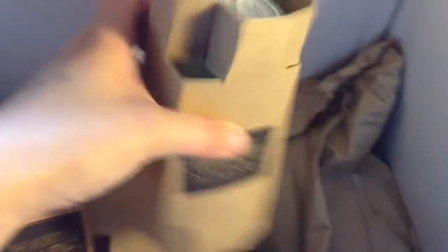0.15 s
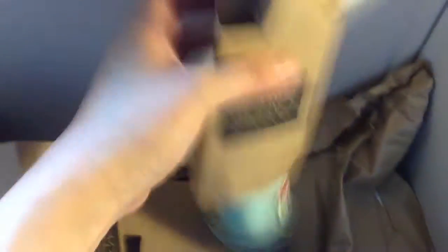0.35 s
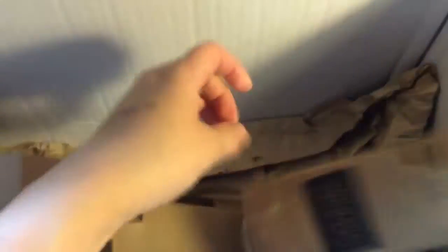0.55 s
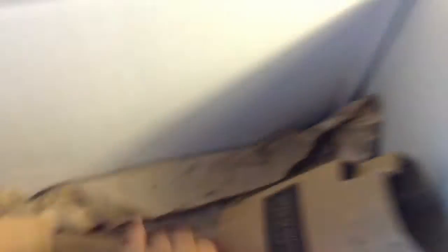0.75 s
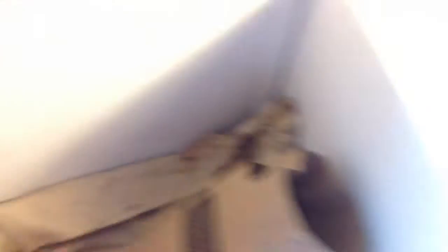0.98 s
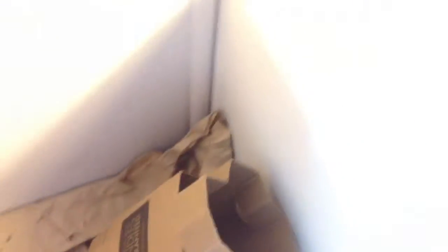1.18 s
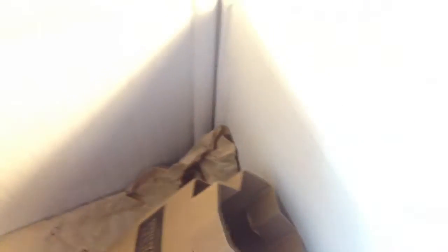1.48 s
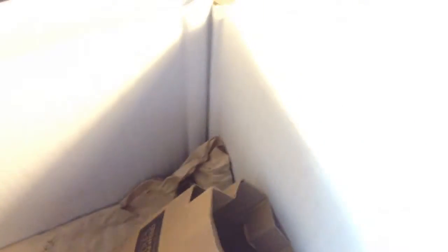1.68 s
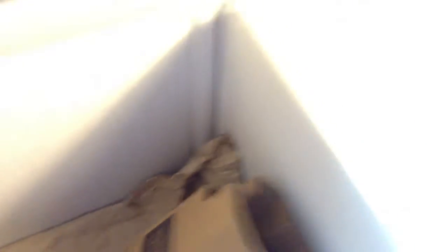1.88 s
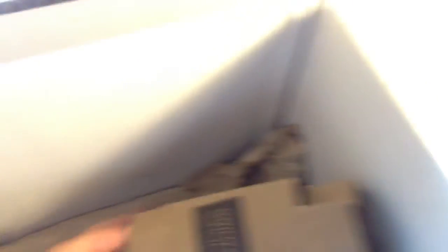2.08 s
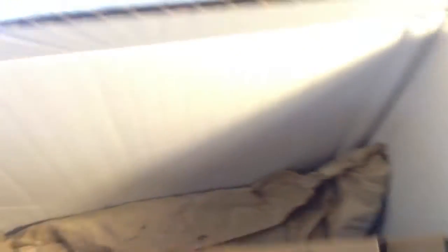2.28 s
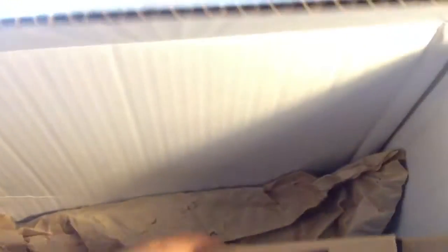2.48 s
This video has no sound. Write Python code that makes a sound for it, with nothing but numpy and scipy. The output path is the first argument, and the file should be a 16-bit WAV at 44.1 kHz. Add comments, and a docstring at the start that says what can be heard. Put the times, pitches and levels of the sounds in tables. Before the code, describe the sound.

Packing paper crinkles and rustles as a hand digs through a cardboard box, with knocks.

```python
"""A hand digs through a big cardboard box, close to the microphone, in a small room.
A small carton is lifted out of packing paper and set aside: its panels knock and its edges snap.
Paper crinkles, cardboard slides with a bright hiss and the walls rumble as they are handled.
Everything rings briefly in the hollow of the box and then in the room."""
import sys
import numpy as np
from scipy import signal
from scipy.fft import rfft, irfft, next_fast_len
from scipy.io import wavfile
from scipy.ndimage import map_coordinates

SR = 44100
rng = np.random.default_rng(int(sys.argv[2]) if len(sys.argv) > 2 else 0)


def put_to_file(sound):
    """Save the sound as 16-bit audio at rate SR, in the file named by the first command-line argument."""
    columns = np.atleast_2d(sound).T  # one column per channel
    safe = np.clip(columns, -1, 1)
    whole_steps = np.round(safe * 32767)
    wavfile.write(sys.argv[1], SR, whole_steps.astype(np.int16))


N = 116865

# strokes of the hand through paper and cardboard: start_s, length_s, hiss_db, crinkle_db, rumble_db
HAND_STROKES = [(0, 0.051, -45.5, -60, -61), (0.124, 0.04, -47.5, -57.5, -65),
                (0.21, 0.041, -35.5, -39, -55.5), (0.237, 0.053, -30.5, -29.5, -48),
                (0.323, .10, -38, -28, -26.5), (0.449, 0.063, -38, -31, -30),
                (0.526, 0.09, -39.5, -31.5, -33), (0.618, 0.037, -44, -40.5, -45),
                (0.682, 0.044, -50, -32, -38.5), (0.715, 0.058, -36, -32.5, -37.5),
                (0.837, 0.072, -45, -44, -51), (0.929, 0.097, -42, -41.5, -44.5),
                (1.04, 0.079, -45.5, -47.5, -48.5), (1.151, 0.062, -45.5, -53, -58),
                (1.206, 0.078, -36, -42.5, -42.5), (1.287, 0.087, -36, -47.5, -57),
                (1.328, 0.094, -36.5, -39, -47), (1.442, 0.048, -70, -63, -40),
                (1.503, 0.027, -39, -35, -30.5), (1.587, 0.39, -46, -46.5, -51),
                (1.733, 0.031, -35.5, -35.5, -36.5), (1.766, 0.063, -44, -36, -40),
                (1.851, 0.08, -37.5, -33.5, -37), (1.956, .06, -38, -41, -45.5),
                (2.022, 0.18, -45, -43, -43), (2.148, 0.043, -40, -46, -50),
                (2.211, 0.083, -44, -41.5, -39), (2.324, 0.041, -52, -38.5, -37.5),
                (2.439, 0.051, -44.5, -42, -39), (2.49, 0.059, -42.5, -40, -38),
                (2.568, 0.046, -47.5, -44, -47)]


def amp(db):
    """Decibels to gain."""
    return 10 ** (np.asarray(db) / 20)


def unit(x):
    """Scale to rms 1."""
    return x / np.sqrt(np.mean(x ** 2) + 1e-20)


def along(points, hz):
    """Read (frequency_hz, value) points on a log axis."""
    f, values = np.transpose(points)
    return np.interp(np.log(hz + 1), np.log(f + 1), values)


def wobble(rate):
    """A smooth random curve, rate knots a second."""
    return map_coordinates(rng.standard_normal(2000), [np.arange(N) * rate / SR], mode="wrap")


def filtered(x, response):
    """x through a complex response of frequency."""
    size = next_fast_len(len(x) + 8192)
    return irfft(rfft(x, size) * response(np.fft.rfftfreq(size, 1 / SR)), size)[:len(x)]


def coloured(x, spectrum, size=4096):
    """x through a causal filter with the given spectrum, at rms 1."""
    cepstrum = irfft(np.log(amp(along(spectrum, np.fft.rfftfreq(size, 1 / SR)))))
    cepstrum[1:size // 2] *= 2  # fold to minimum phase
    cepstrum[size // 2 + 1:] = 0
    impulse = irfft(np.exp(rfft(cepstrum)))
    return unit(signal.fftconvolve(x, impulse)[:len(x)])


def resonance(f, centre, width):
    """Response of one resonance."""
    return 1j * f * width / (centre ** 2 - f ** 2 + 1j * f * width)


def fade(t, t60):
    """Exponential decay, 60 dB down at t60."""
    return np.exp(-np.log(1000) * t / t60)


def add(track, start_s, sound):
    """Mix a sound into the track."""
    part = track[max(round(start_s * SR), 0):][:len(sound)]
    part += sound[:len(part)]


def grains(rate, spread_db):
    """Random tiny impulses of uneven size, rate a second."""
    size = amp(spread_db * np.clip(rng.standard_normal(N), -2, 2))
    return unit((rng.random(N) < rate / SR) * size * rng.choice([-1, 1], N))


def burst(noise, envelope):
    """Noise under an envelope, with the same energy at every draw."""
    return unit(noise * envelope) * np.sqrt(np.mean(envelope ** 2))


def room_tone(level_db=-49.5):
    """The faint steady noise of the room."""
    # spectrum of the air: frequency_hz, level_db
    air = [(80, -9), (170, -7), (400, -16.5), (1000, -16), (3000, -20.0), (15000, -20.5)]
    return amp(level_db) * coloured(rng.standard_normal(N), air)


def room_tail(x, level_db=-16.5):
    """The small room returns a short tail whose treble dies first."""
    # decay of the room: frequency_hz, t60_s
    decay_times = [(150, 0.36), (1000, 0.21), (4000, 0.14), (14000, 0.12)]
    hz, t, bands = signal.stft(rng.standard_normal(SR // 2), SR, nperseg=256)
    tail = signal.istft(bands * fade(t, along(decay_times, hz)[:, None]), SR, nperseg=256)[1]
    delayed = np.pad(tail / np.linalg.norm(tail), (SR // 150, 0))
    return amp(level_db) * signal.fftconvolve(x, delayed)[:N]


def box_hollow(x, detune=0.059, echo_db=-8, step_s=0.1):
    """The hollow rings and its walls add quick echoes; both shift as the hand moves."""
    # air resonances of the box: pitch_hz, width_hz, level_db
    air_modes = [(156, 50, -3), (376, 68, -8), (469, 43, -6), (680, 73, -9), (801, 52, -2.5),
                 (2460, 87, -11)]
    out, t = x, np.arange(N) / SR
    f = np.fft.rfftfreq(SR // 5, 1 / SR)
    for centre_s in np.arange(0, N / SR + step_s, step_s):
        echoes = np.zeros(2 * (len(f) - 1))
        for delay_s, sign in zip(rng.uniform(0.0013, .012, size=10), rng.choice([-1, 1], size=10)):
            add(echoes, delay_s, np.array([sign * fade(delay_s, 0.026)]))
        ring = irfft(sum(amp(db) * resonance(f, hz * (1 + detune * rng.uniform(-1.15, 1)), width)
                         for hz, width, db in air_modes))
        impulse = ring + amp(echo_db) * echoes / np.linalg.norm(echoes)
        crossfade = np.maximum(1 - abs(t - centre_s) / step_s, 0)
        out = out + signal.oaconvolve(x * crossfade, impulse)[:N]
    return out


def stroke_gain(levels_db, rise_s=0.019, t60_s=0.15):
    """Each stroke of the hand swells, holds and dies away; one gain per sample."""
    power, t = np.zeros(N), np.arange(N) / SR
    for (start_s, length_s, *_), db in zip(HAND_STROKES, levels_db):
        rise = np.clip((t - start_s) / rise_s, 0, 1)
        release = fade(np.maximum(t - start_s - length_s, 0), t60_s)
        power += (amp(db) * rise * release) ** 2
    return np.sqrt(power)


def wall_rumble(gain, trim_db=-0.5):
    """Small shoves make the box walls rumble."""
    # spectrum of the flexing walls: frequency_hz, level_db
    wall_spectrum = [(25, -56), (65, -8.5), (100, -1.5), (160, 1), (250, 1), (450, -5.5), (750, -22),
                     (2000, -32.5)]
    return amp(trim_db) * gain * coloured(grains(rate=660, spread_db=3.0), wall_spectrum)


def cardboard_slide(gain, trim_db=2.5, fizz_hz=12500, waver_db=-3.5):
    """Fibres catch and slip as cardboard slides over paper; the highest fizz wavers on its own."""
    # spectrum of the friction: frequency_hz, level_db
    hiss_spectrum = [(300, -11), (1000, -7), (2500, 4.5), (4500, 4.5), (7500, 1), (10500, 4), (13500, 6.5),
                     (15500, 5.5)]
    slips = coloured(grains(rate=9900, spread_db=1.5) * amp(0.88 * wobble(70)), hiss_spectrum)
    fizz = filtered(slips, lambda f: 1 - 1 / (1 + (f / fizz_hz) ** 10))
    return amp(trim_db) * gain * unit(slips - fizz + fizz * amp(waver_db * wobble(43.6)))


def crinkles(per_s=130, centre_hz=1480, log_spread=1.36, t60_cycles=10.3):
    """Facets of paper flip over; each rings for a few cycles at its own pitch."""
    out, t = np.zeros(N), np.arange(SR // 25) / SR
    for when, pitch, size in rng.random((int(per_s * N / SR), 3)):
        hz = centre_hz * np.exp(log_spread * (2 * pitch - 1))
        add(out, when * N / SR, size * np.sin(2 * np.pi * hz * t) * fade(t, t60_cycles / hz))
    return unit(out)


def packing_paper(gain, trim_db=-1.5, crinkle_db=-8):
    """Crushed paper buckles in tiny clumps, with sparser crinkles among them."""
    # spectrum of the buckling paper: frequency_hz, level_db
    paper_spectrum = [(100, -23), (300, -8.5), (750, 4.5), (1200, 2), (1800, -1.5), (3000, -5),
                      (5500, -9.5), (9000, -12), (15000, -80)]
    buckles = coloured(grains(rate=3000, spread_db=3.5) * amp(1.8 * wobble(90)), paper_spectrum)
    return amp(trim_db) * gain * unit(buckles + amp(crinkle_db) * crinkles())


def carton_scrape(start_s=0.226, length_s=0.058, pitch_hz=1630, level_db=-26):
    """The edge of the lifted carton chatters ever harder over the paper until it slips free."""
    t = np.arange(N) / SR - start_s
    swell = np.clip(t / length_s, 0, 1) * fade(np.maximum(t - length_s, 0), .02)
    catches = grains(rate=2000, spread_db=3)
    chatter = filtered(catches, lambda f: resonance(f, pitch_hz, pitch_hz / 2) ** 2)
    return amp(level_db) * burst(chatter, swell)


def sheet_flutter(noise, hz, q=7.6, overtone=2.38, overtone_db=-15):
    """The sheet around a crease flutters in two broad modes, with the treble rolled off."""
    def response(f):
        low = resonance(f, hz, hz / q)
        high = resonance(f, overtone * hz, overtone * hz / q)
        return (low - amp(overtone_db) * high) / (1 + 1j * f / (3 * hz))
    return filtered(noise, response)


def crease_snaps(body_rise_s=0.0012, crack_rise_s=0.00026):
    """A crease gives way: a short crack, duller where the paper is soft, and the sheet's flutter."""
    # creases and carton edges giving way: start_s, body_db, body_hz, crack_db, crack_top_hz, t60_s
    snaps = [(.285, -19, 1580, -23, 9000, 0.023), (0.2983, -40, 1320, -10.5, 15000, 0.0069),
             (0.331, -37, 2530, -29, 14000, .07), (0.338, -11, 2610, -15, 15000, 0.017),
             (0.3433, -18.5, 1360, -9.5, 13900, .011), (0.3542, -13, 990, -24, 6000, 0.0087),
             (.418, -21, 1010, -20.5, 10500, 0.014), (.474, -15, 970, -25, 6900, 0.016),
             (.488, -16, 2160, -28, 6000, 0.011), (0.4938, -19.5, 685, -25.5, 14000, 0.033),
             (.5475, -19, 1270, -27, 7000, 0.03), (.5585, -23, 1220, -36, 6000, 0.017),
             (0.5727, -25, 1190, -26, 11800, 0.031), (.597, -23.5, 1200, -28, 6000, 0.029),
             (.610, -18.5, 1160, -24.5, 6000, 0.019), (0.68, -30.5, 1380, -32, 5030, 0.017),
             (0.7105, -28.5, 1370, -22, 5700, 0.013), (.7635, -25, 1090, -33, 6000, 0.029),
             (0.9754, -25, 2870, -34, 4000, 0.017), (.990, -33, 1060, -37, 7000, .027),
             (1.254, -30.5, 970, -33.5, 8000, 0.03), (1.411, -30, 844, -31.5, 12000, 0.041),
             (1.492, -40, 2270, -30.5, 10100, 0.019), (1.519, -29.5, 2030, -46, 6000, 0.024),
             (1.6585, -22, 1000, -29, 12000, .015), (1.6592, -19.5, 5660, -30.5, 13000, .012),
             (1.66, -16, 2280, -44, 2500, 0.011), (1.8125, -25.5, 2370, -30, 12000, 0.014),
             (2.042, -25.5, 850, -38.5, 3990, 0.021), (2.096, -25.5, 890, -39, 4960, 0.012),
             (2.1211, -25.5, 920, -43, 4000, .016), (2.372, -20, 920, -25, 11300, 0.016),
             (2.511, -34.5, 593, -36, 4500, 0.034), (2.579, -26, 840, -38, 9100, 0.014)]
    # spectrum of a crack: frequency_hz, level_db
    crack_spectrum = [(60, -30), (350, -5), (900, 6.5), (2500, 6), (5000, 2), (8000, 0.5), (15000, 4)]
    out, t = np.zeros(N), np.arange(SR // 8) / SR
    for start_s, body_db, body_hz, crack_db, top_hz, t60_s in snaps:
        body = sheet_flutter(rng.standard_normal(len(t)), body_hz)
        bright = coloured(rng.standard_normal(len(t)), crack_spectrum)
        edge = filtered(bright, lambda f: 1 / np.hypot(1, (f / top_hz) ** 3))
        flutter = amp(body_db) * burst(body, fade(t, t60_s) * (1 - np.exp(-t / body_rise_s)))
        crack = amp(crack_db) * burst(edge, fade(t, t60_s) * (1 - np.exp(-t / crack_rise_s)))
        add(out, start_s, 2 * (flutter + crack))
    return out


def panel_knocks(rise_cycles=0.42):
    """A soft blow sets a cardboard panel swinging for a few cycles."""
    # blows on the panels: start_s, level_db, pitch_hz, t60_s
    knocks = [(.2978, -2, 696, 0.013), (0.298, -20.5, 235, 0.073), (.3425, -4.5, 690, 0.013),
              (.351, -8, 366, 0.037), (.355, -9.5, 158, 0.033), (.493, -18.5, 471, 0.04),
              (.4965, 5, 178, 0.02), (.508, -11, 222, 0.052), (.557, -18.5, 942, 0.036),
              (.579, -3.5, 229, 0.02), (1.399, -21, 274, .044), (1.42, -20.5, 199, 0.064),
              (1.4926, -6, 267.3, 0.037), (1.495, -8, 157, 0.024), (1.605, -23.5, 248, 0.025),
              (1.645, -23.5, 237, 0.034), (1.785, -16.5, 237, 0.018), (1.815, -13.5, 215, 0.017),
              (2.125, -29, 175.6, .1), (2.192, -23, 165, 0.088), (2.271, -10, 222, 0.026),
              (2.341, -18, 266, 0.032), (2.372, -14, 563, 0.019), (2.377, -19.5, 173, .035)]
    # modes of a panel: pitch_ratio, level_db, t60_ratio
    panel_modes = [(.64, -9.5, 0.8), (1, 1, 1.275), (1.48, -10, 1.44), (2.3, -18, 1.03), (3.6, -17, 1.2)]
    out, t = np.zeros(N), np.arange(SR // 4) / SR
    for start_s, level_db, hz, t60_s in knocks:
        ring = np.zeros(len(t))
        for pitch_ratio, mode_db, t60_ratio in panel_modes:
            swing = np.sin(2 * np.pi * hz * pitch_ratio * t)
            ring += amp(mode_db + rng.normal(0, 1)) * swing * fade(t, t60_s * t60_ratio)
        attack = 1 - np.exp(-t * hz / rise_cycles)
        add(out, start_s, amp(level_db) * ring * attack)
    return out


def scene():
    """The handling sounds inside the box, close up, with the room faint behind them."""
    hiss_db, crinkle_db, rumble_db = np.transpose(HAND_STROKES)[2:]
    handling = panel_knocks() + crease_snaps() + carton_scrape()
    handling += packing_paper(stroke_gain(crinkle_db))
    handling += cardboard_slide(stroke_gain(hiss_db))
    handling += wall_rumble(stroke_gain(rumble_db))
    near = box_hollow(handling)
    return (near + room_tail(near) + room_tone())[None]


def record(dry):
    """One microphone: the recorder thins the deep bass, rounds off peaks and cuts the highest treble."""
    low_cut_hz, ceiling, top_hz = 161, 0.8, 15500
    thinned = signal.sosfilt(signal.butter(2, low_cut_hz, "highpass", fs=SR, output="sos"), dry[0])
    rounded = thinned / (1 + (thinned / ceiling) ** 4) ** .25
    return filtered(rounded, lambda hz: hz < top_hz)[None]


dry = scene()
out = record(dry)
put_to_file(out)
```